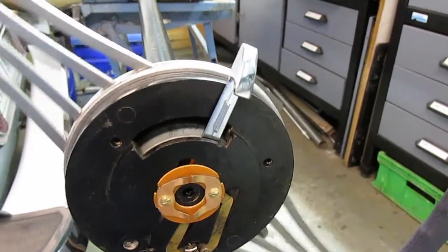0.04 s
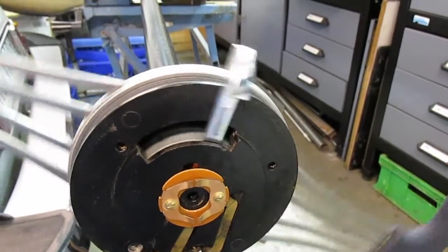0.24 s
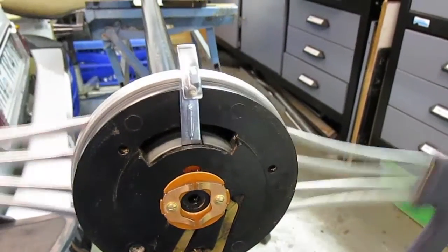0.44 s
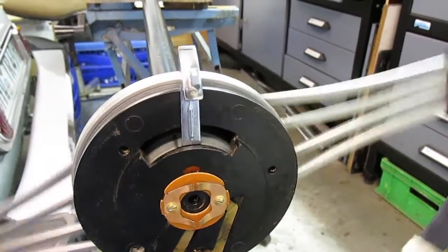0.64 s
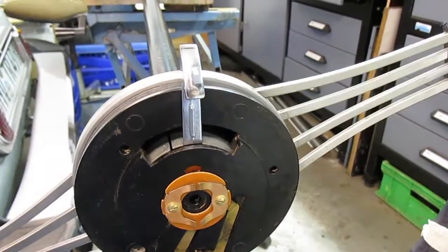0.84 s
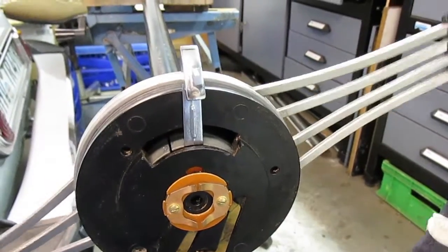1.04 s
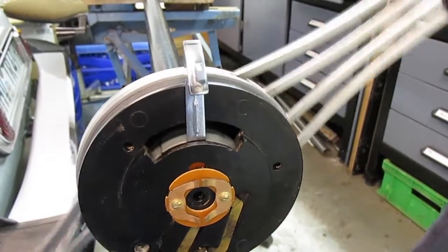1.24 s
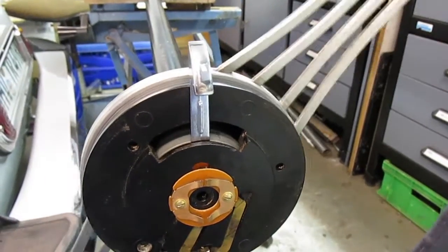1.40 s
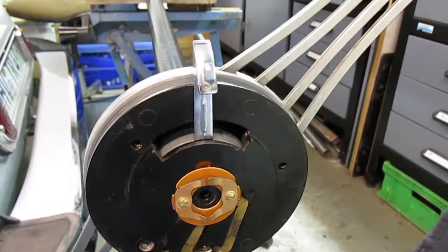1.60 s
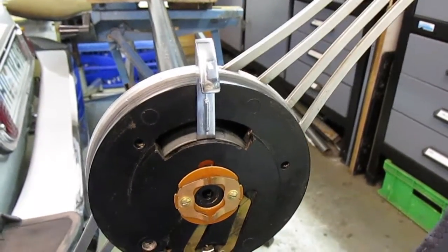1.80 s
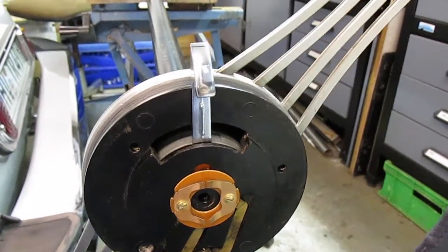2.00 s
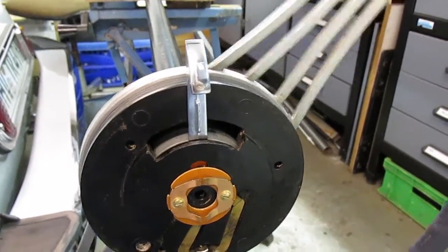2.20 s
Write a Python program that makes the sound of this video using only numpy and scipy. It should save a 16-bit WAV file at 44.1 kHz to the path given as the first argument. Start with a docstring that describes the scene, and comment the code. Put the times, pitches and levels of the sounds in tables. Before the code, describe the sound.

A steel indicator lever snaps back with a sharp, bright clink at about 0.4 seconds, ringing briefly, just after a dull knock from the steering wheel hub at 0.2 seconds. The wheel keeps turning close by, with small knocks around 0.8 and 1.2 seconds, a soft sliding hiss near 1.4 and a light tick near 1.9. Faint electrical hum and quiet workshop room noise lie underneath.

```python
"""A faint rub and a dull knock come first: the hub of a steering wheel turning close by in a quiet workshop.
Then the steel indicator lever snaps back against its stop and rings with a bright clink.
As the wheel turns on, small knocks, ticks and a sliding hiss follow, over mains hum and faint room noise.
The clink and knocks are mostly fading tones ("modes"); the rubs and hisses are shaped noise."""
import sys
import numpy as np
from scipy import signal
from scipy.fft import rfft, irfft
from scipy.io import wavfile

SR = 44100
rng = np.random.default_rng(int(sys.argv[2]) if len(sys.argv) > 2 else 0)


def to_wav(sig):
    """Store sig (one row per channel, or 1-D mono) as 16-bit WAV at the path in sys.argv[1].

    Samples outside -1..1 are clipped; the rate is SR.
    """
    pcm = np.clip(np.atleast_2d(sig), -1, 1) * 32767
    pcm = np.round(pcm).astype(np.int16)
    wavfile.write(sys.argv[1], SR, pcm.T)  # frames by channels


N = 103635
T = np.arange(N) / SR
HZ = np.arange(N // 2 + 1) * SR / N

# the tones of the steel lever; close pairs beat slowly (f/Hz)
LEVER_HZ = [2995, 3365, 4030, 4686, 5495, 5979, 5988, 7341, 7344, 8526, 8531, 9831, 10289, 11358, 12840,
            13042]
# how each tone rings; t60 is the time to fade by 60 dB (level/dB, t60/s, left minus right/dB)
LEVER_RING = [(-36.5, 0.1, -1), (-29.5, 0.034, -6), (-28.5, 0.078, -5), (-27, 0.07, 4), (-33, 0.15, -9),
              (-14.5, 0.09, 4.5), (-45, 0.46, 5), (-22.5, 0.081, 0), (-40, .36, 5), (-28.5, 0.34, 1),
              (-24.5, 0.16, 8.5), (-22.5, 0.15, 7.5), (-26.5, 0.071, 2), (-25.5, 0.1, -3),
              (-26.5, 0.065, 8.5), (-35, 0.099, -5)]
# lever tones that swing opposite ways on the left and right (f/Hz)
OPPOSED_HZ = [5979, 12840, 13042]
# tone colour of a hard hit (f/Hz, level/dB)
CRACK_COLOUR = [(900, -37), (1500, 0), (2400, -14), (3500, 8), (7000, 13), (11000, 6.5), (16000, 2)]
# light touches that make the lever sing (t/s, level/dB, centre f/Hz)
LEVER_TOUCHES = [(0.701, -39, 8500), (1.19, -36.5, 8500), (1.238, -34, 9800), (1.283, -33.5, 8200)]
# the tones of the hub (f/Hz, level/dB, t60/s)
HUB_MODES = [(1240, -21.5, 0.023), (1359, -20.5, 0.025), (1533, -32, 0.029), (1897, -28, 0.027),
             (2227, -27.5, 0.031), (3098, -23.5, 0.023), (3286, -28.5, 0.017), (4330, -36, 0.012)]
# hollow ring of the housing behind the hub (f/Hz, level/dB, t60/s)
HOUSING_MODES = [(524, -58, 0.31), (612, -56, 0.54)]
# knocks in the hub (t/s, level/dB, treble tilt/dB per octave)
HUB_KNOCKS = [(0.2296, 0, 3), (0.2353, -24, -11), (0.254, -15, -8), (0.26, -24, -12), (0.2675, -16, -17),
              (0.3114, -26, 7), (0.3633, -25, 7.5), (0.7021, -26, -18), (0.8091, -19, -11.5),
              (1.1619, -23, -14), (1.2829, -21.5, -3.5)]
# tone colour of a knock's gritty tail (f/Hz, level/dB)
GRIT_COLOUR = [(250, -25), (650, 2), (850, -4.5), (1500, 1.5), (3400, -6), (6000, -16), (16000, -40)]
# short scrapes in the mechanism (t/s, level/dB, t60/s, centre f/Hz, left minus right/dB)
SCRAPE_EVENTS = [(0.221, -38.5, 0.035, 4800, 1.5), (0.3632, -43, 0.038, 8500, 0),
                 (.849, -55, 0.029, 4700, 0), (1.472, -46.5, 0.031, 11000, 2),
                 (1.8817, -36.5, 0.0058, 13500, 12), (1.888, -45.5, 0.033, 9500, 2),
                 (1.936, -52, .09, 9650, 4), (1.998, -59, 0.1, 12500, 9), (2.164, -56, 0.16, 3000, 0)]
# how loudly the hub rubs (t/s, level/dB)
RUB_LEVELS = [(0, -67), (.32, -51.5), (.42, -56), (.70, -57), (.78, -67.5), (.9, -75), (1.12, -65.5),
              (1.3, -55.5), (1.55, -73), (2.12, -72.5), (2.35, -54.5)]
# pitches that the rubbing brings out (f/Hz, width/Hz, level/dB)
RUB_RESONANCES = [(1284, 440, 2), (2248, 70, 3.5), (3130, 105, 1), (3470, 600, -6.5), (7350, 710, -18),
                  (10170, 570, -10.5)]
# loudness of the sliding hiss (t/s, level/dB)
HISS_LEVELS = [(0, -66.5), (.42, -61), (.50, -53.5), (.68, -56), (.8, -64), (1.1, -69), (1.25, -59),
               (1.34, -58), (1.39, -49.5), (1.435, -50), (1.47, -60), (1.6, -61), (1.8, -65.5),
               (2.15, -66.5), (2.35, -61)]
# its tone colour (f/Hz, level/dB)
HISS_COLOUR = [(800, -33), (2500, -7), (5000, -1), (8600, 3.5), (12500, 1), (16000, -4.5)]
# loudness of the low rustle (t/s, level/dB)
RUSTLE_LEVELS = [(1.15, -79), (1.42, -64), (1.82, -55.5), (1.89, -62.5), (2.35, -71.5)]
# its tone colour (f/Hz, level/dB)
RUSTLE_COLOUR = [(70, -9.5), (220, -0.5), (420, -1), (1000, -8), (1700, -6), (2800, -25.5), (8000, -30)]
# soft swells of noise (peak t/s, half-length/s, centre f/Hz, half-width/octaves, level/dB)
NOISE_SWELLS = [(.78, 0.14, 11500, .13, -65), (1.75, 0.083, 410, 0.31, -58)]
# the tones of the mains hum (f/Hz, level/dB)
HUM_TONES = [(200, -72.5), (300, -69), (400, -70.5)]
# tone colour of the room noise (f/Hz, level/dB)
AIR_COLOUR = [(20, -6.5), (76, -2), (90, 7.5), (110, -2), (300, 0.5), (550, -2.5), (850, -2), (2000, -9),
              (16000, -26)]

SNAP_S, SEAT_S, TOUCH_DB, CLINK_RISE_S = .4333, .0013, -7, .00015
CHATTER_DB, CHATTER_HZ, CHATTER_T60_S = 3, 110, .4
CRACK_DB, CRACK_T60_S, RIGHT_LAG_S = -24.5, 0.036, .000021
SING_RISE_S, SING_WIDTH_HZ = 0.0074, 1500
KNOCK_RISE_S, HOUSING_RISE_S = 0.00055, .006
HUB_LOW_HZ = 907  # the small hub gives off little sound below this
GRIT_DB, GRIT_T60_S, CLICK_DB, CLICK_T60_S = -35.5, 0.072, -41.5, 0.028
RUB_ROUGH_DB, HUM_WAVER_DB, AIR_DB = 0.5, 1.5, -59.5
ROOM_T60_S, ROOM_GAP_S = 0.34, 0.0072
KNOCK_ROOM_HZ, CLINK_ROOM_HZ = 1520, 8600  # above these the echo grows dull


def lever():
    """The steel lever hits its stop with a crack and rings; later, light touches make it sing."""
    t = T[:SR // 2]
    modes = []
    for hz, (db, t60, pan_db) in zip(LEVER_HZ, LEVER_RING):
        lag = .5 / hz if hz in OPPOSED_HZ else RIGHT_LAG_S
        tone = np.sin(2 * np.pi * hz * np.array([t, t - lag]))
        # chatter against the stop roughens the start of the ring
        chatter_db = CHATTER_DB * waver(CHATTER_HZ)[:len(t)] * fade(t, CHATTER_T60_S)
        modes.append(amp(db + chatter_db) * pan(pan_db) * tone * fade(t, t60))
    crack = amp(CRACK_DB) * noise(colour(CRACK_COLOUR))[:, :len(t)] * fade(t, CRACK_T60_S)
    # the lever meets its stop lightly, then seats fully
    touch = amp(TOUCH_DB) * rise(t, CLINK_RISE_S)
    seat = (1 - amp(TOUCH_DB)) * rise(t - SEAT_S, CLINK_RISE_S)
    out = place((sum(modes) + crack) * (touch + seat), SNAP_S)
    for start, db, centre_hz in LEVER_TOUCHES:
        ring = sum(mode / np.hypot(1, (hz - centre_hz) / SING_WIDTH_HZ)
                   for hz, mode in zip(LEVER_HZ, modes))
        out = out + place(amp(db) * ring * rise(t, SING_RISE_S), start)
    return room(out, wet_db=-15, dull_hz=CLINK_ROOM_HZ)


def hub_knocks():
    """Each blow on the hub gives a click, quickly dying tones, a hollow ring and a gritty tail."""
    t = T[:SR // 2]
    hollow = sum(amp(db) * np.sin(2 * np.pi * hz * t) * fade(t, t60) for hz, db, t60 in HOUSING_MODES)
    hollow *= rise(t, HOUSING_RISE_S)
    low_cut = signal.butter(2, HUB_LOW_HZ, "high", fs=SR, output="sos")[[0, 0]]  # twice: steeper
    grit = amp(GRIT_DB) * noise(colour(GRIT_COLOUR), width=0.5)
    click = amp(CLICK_DB) * noise(colour(CRACK_COLOUR), width=0.98)
    out = 0
    for start, db, tilt_db in HUB_KNOCKS:
        ring = sum(amp(mode_db + tilt_db * np.log2(hz / 1400)) * np.sin(2 * np.pi * hz * t) * fade(t, t60)
                   for hz, mode_db, t60 in HUB_MODES)
        body = signal.sosfilt(low_cut, ring * rise(t, KNOCK_RISE_S)) + hollow
        crunch = grit * fade(T - start, GRIT_T60_S) + click * fade(T - start, CLICK_T60_S)
        out = out + amp(db) * (place(body[None], start) + crunch)
    return room(out * pan(-3.5), wet_db=-11, dull_hz=KNOCK_ROOM_HZ)


def scrapes():
    """Parts of the mechanism slip and tick in short, bright bursts of noise."""
    out = 0
    for start, db, t60, hz, pan_db in SCRAPE_EVENTS:
        slip = noise(band(hz, octaves=0.78), width=0.77)
        out = out + amp(db) * pan(pan_db) * slip * fade(T - start, t60)
    return room(out, wet_db=-3.5, dull_hz=CLINK_ROOM_HZ)


def wheel_turning():
    """Uneven rubbing sounds the hub, along with a sliding hiss, a low rustle and soft swells."""
    hub_power = sum(amp(2 * db) / (1 + ((HZ ** 2 - hz ** 2) / ((HZ + 1) * width)) ** 2)
                    for hz, width, db in RUB_RESONANCES)
    rub = noise(np.sqrt(hub_power), width=0.47) * curve(RUB_LEVELS) * pan(-3.5)
    rub *= amp(RUB_ROUGH_DB * waver(rate_hz=24))
    hiss = noise(colour(HISS_COLOUR)) * curve(HISS_LEVELS)
    rustle = noise(colour(RUSTLE_COLOUR), width=0.51) * curve(RUSTLE_LEVELS)
    swells = sum(amp(db) * noise(band(hz, octaves), width=0.5) * np.exp(-((T - peak) / half_s) ** 2)
                 for peak, half_s, hz, octaves, db in NOISE_SWELLS)
    return rub + hiss + rustle + swells


def workshop():
    """Mains hum wavers over steady room noise."""
    hum = 0
    for hz, db in HUM_TONES:
        peak = np.sqrt(2) * amp(db + HUM_WAVER_DB * waver(rate_hz=6.4))
        hum = hum + peak * np.sin(2 * np.pi * (hz * T + rng.random()))
    return hum + amp(AIR_DB) * noise(colour(AIR_COLOUR))


def room(x, wet_db, dull_hz):
    """Adds the workshop's short wash of echoes, duller than the sound and different on each side."""
    age = T[:SR // 2] - ROOM_GAP_S
    tail = rng.standard_normal((2, SR // 2)) * fade(age, ROOM_T60_S)
    tail /= np.sqrt(np.sum(tail ** 2) / 2)
    tail = signal.lfilter(*signal.butter(1, dull_hz, fs=SR), tail)
    return x + amp(wet_db) * signal.fftconvolve(x, tail, axes=1)[:, :N]


def amp(db):
    """Turns decibels into a gain, the number to multiply a sound by."""
    return 10 ** (np.asarray(db) / 20)


def pan(db):
    """Left and right gains that make the left side db louder."""
    return amp(np.array([[db], [-db]]) / 2)


def curve(points):
    """Gain over time from (t/s, level/dB) points."""
    return amp(np.interp(T, *np.array(points).T))


def colour(points):
    """Gain over frequency from (f/Hz, level/dB) points."""
    hz, db = np.array(points).T
    return amp(np.interp(np.log(HZ + 1), np.log(hz), db))


def band(hz, octaves):
    """Gain over frequency with one broad hump around hz."""
    return 1 / (1 + (np.log2((HZ + 1) / hz) / octaves) ** 2)


def noise(gain, width=1):
    """Stereo noise of strength 1 in a given tone colour; width 1 makes the two sides unrelated."""
    mid, side = irfft(rfft(rng.standard_normal((2, N))) * gain, N)
    out = np.array([mid + width * side, mid - width * side])
    return out / out.std()


def waver(rate_hz):
    """A random wobble of typical size 1, mostly slower than rate_hz."""
    return noise(1 / (1 + (HZ / rate_hz) ** 4), width=0)[0]


def fade(age, t60):
    """Silence before age 0, then a fall of 60 dB every t60 seconds."""
    return (age >= 0) * np.exp(-np.log(1000) * np.clip(age / t60, 0, 10))


def rise(age, length):
    """A ramp from 0 to 1."""
    return np.clip(age / length, 0, 1)


def place(x, start):
    """Delays a sound to its start time."""
    return np.pad(x, ((0, 0), (int(start * SR), N)))[:, :N]


def scene():
    """Lever, wheel and workshop together."""
    return lever() + hub_knocks() + scrapes() + wheel_turning() + workshop()


def record(dry):
    """Cuts the highest treble, above 15900 Hz."""
    return signal.sosfilt(signal.ellip(10, .2, 70, 15900, fs=SR, output="sos"), dry)


dry = scene()
out = record(dry)
to_wav(out)
```